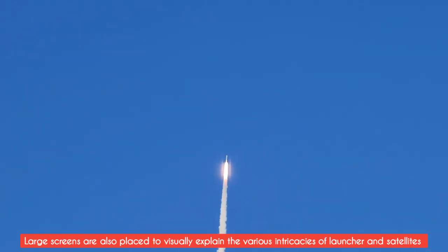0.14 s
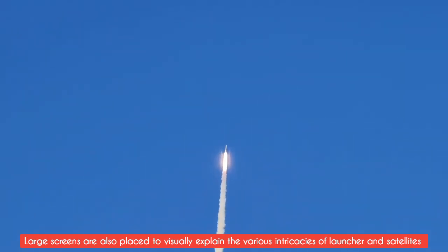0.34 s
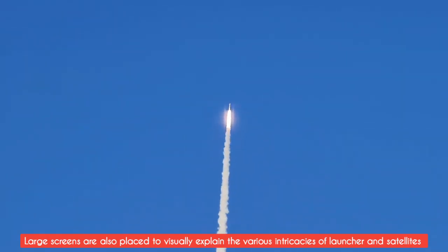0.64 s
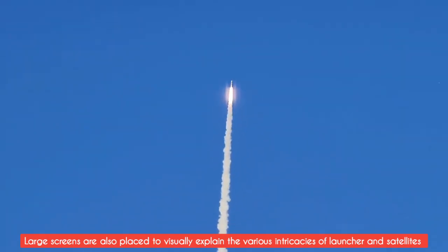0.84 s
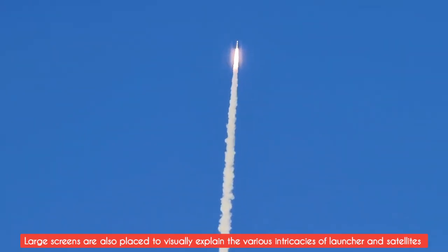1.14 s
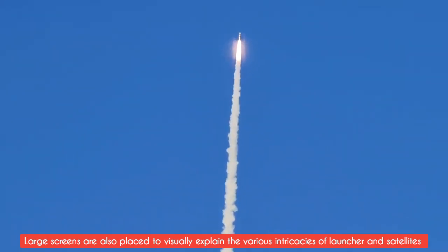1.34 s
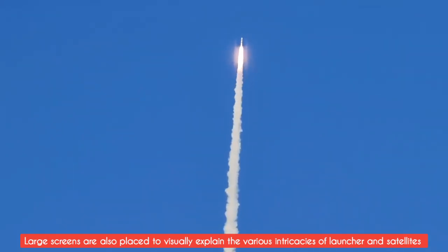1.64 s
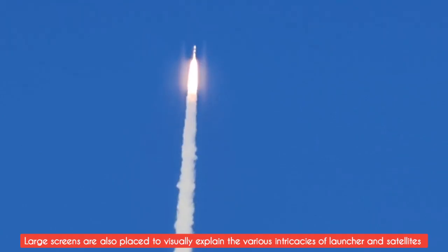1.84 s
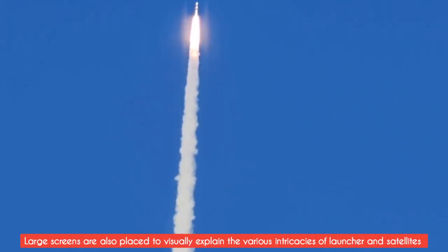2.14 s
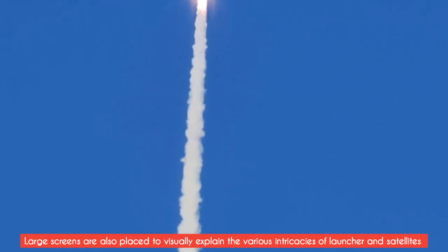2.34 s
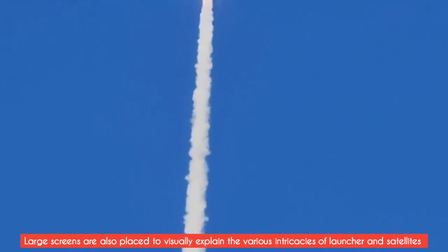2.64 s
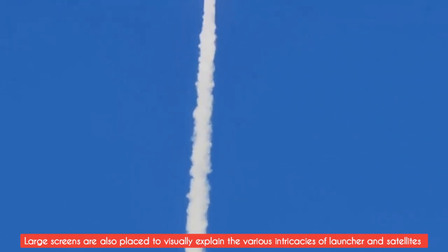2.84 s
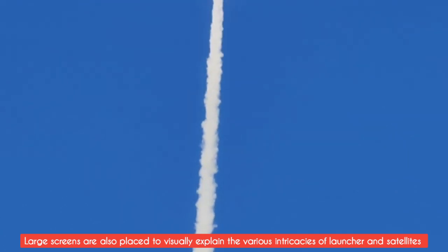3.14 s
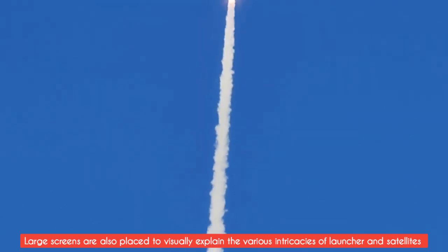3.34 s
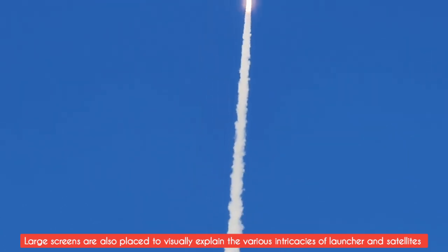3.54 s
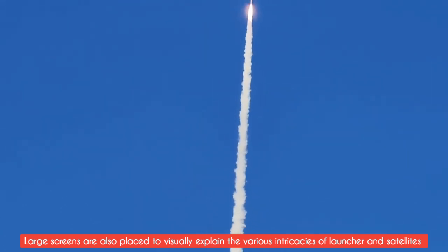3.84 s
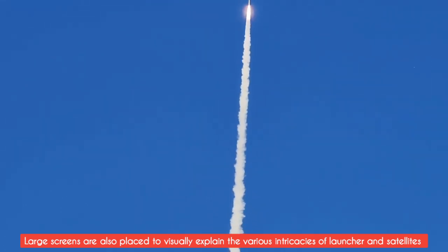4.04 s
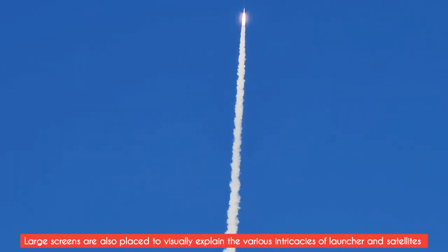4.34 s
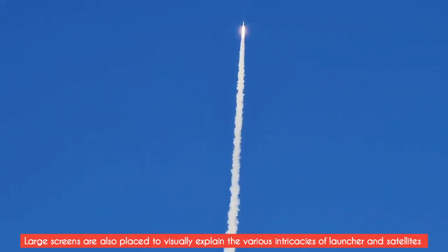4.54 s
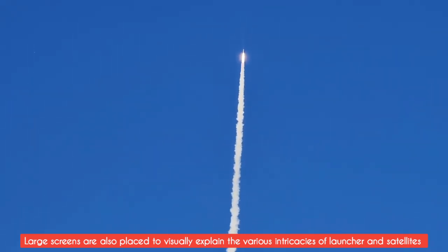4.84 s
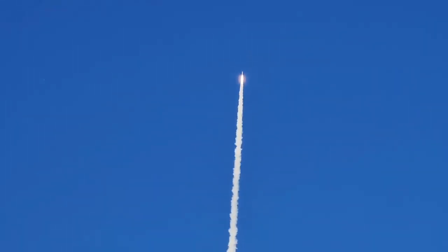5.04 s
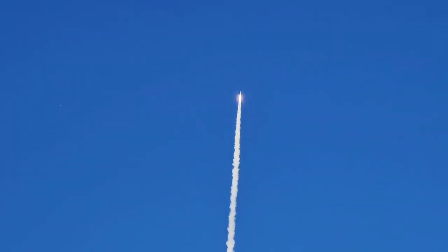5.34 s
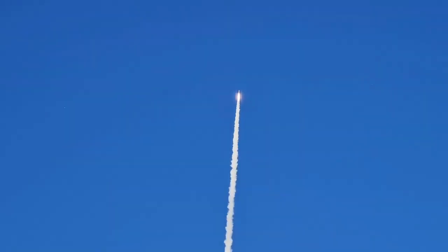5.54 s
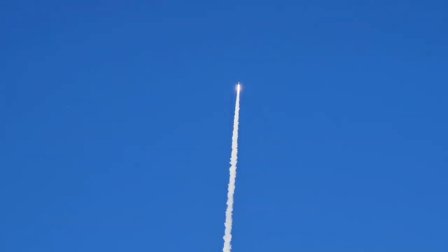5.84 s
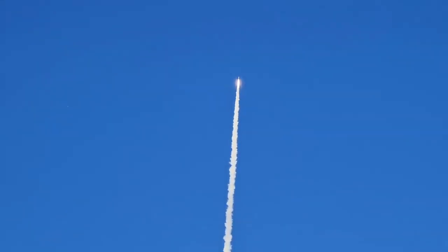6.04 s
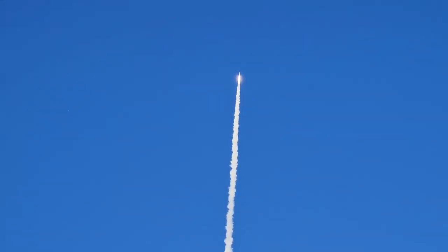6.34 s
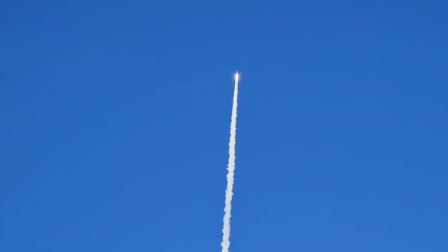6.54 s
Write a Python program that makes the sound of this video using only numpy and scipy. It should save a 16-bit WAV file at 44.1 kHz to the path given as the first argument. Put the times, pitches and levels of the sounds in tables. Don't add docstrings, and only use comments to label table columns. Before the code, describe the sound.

Low far-off rocket roar, sharp wind thumps and faint handling creaks; after a tiny silence, a jet-like hiss surges past and dulls into distance.

```python
import sys
import numpy as np
from scipy import signal
from scipy.fft import rfft, irfft, next_fast_len
from scipy.io import wavfile
from scipy.ndimage import uniform_filter1d

SR = 44100
rng = np.random.default_rng(int(sys.argv[2]) if len(sys.argv) > 2 else 0)


def generate_wav(signal):
    frames = np.transpose(np.atleast_2d(signal))
    scaled = np.clip(frames, -1, 1) * 32767
    pcm = np.round(scaled).astype(np.int16)
    wavfile.write(sys.argv[1], SR, pcm)


def elevation(decibels):
    levels = np.asarray(decibels, float)
    return 10 ** (levels / 20)


N = 295029

# (time [s], push height [full scale], push width [ms], rebound share [1])
GUST_PUSHES = [(.05, 0.12, 0.79, .05), (0.1275, 0.023, 0.51, .01), (0.129, -0.18, 0.65, 0.05),
               (.131, 0.11, 1.5, .01), (0.1405, 0.29, 1.0, 0.0096), (.143, -0.13, 1.14, .01),
               (.148, 0.16, 0.89, 0.28), (0.214, 0.24, 1.3, 0.1), (.841, 0.083, 1.14, .48),
               (1.704, 0.17, 0.84, .48), (1.9, 0.13, 0.62, .48), (2.227, 0.18, 1.06, 0.55),
               (2.317, 0.46, 1.94, .48), (2.437, 0.28, 0.89, .48), (2.828, 0.49, 1.4, .01),
               (2.8314, -0.51, 1.7, .01), (2.835, 0.53, 1.7, .01), (3.9715, 0.43, 0.83, 0.12),
               (4.2823, 0.47, .7, .01), (4.2839, 1.05, 1.01, 0.05), (4.2865, -0.32, 0.69, .01),
               (4.2885, 0.046, 1.2, .01), (4.292, .3, 1.9, .01), (4.413, 0.051, 1.3, .2),
               (4.462, 0.084, 1.8, .2), (4.51, 0.081, 1.13, .2), (4.71, 0.32, 1.03, 0.37),
               (4.973, 0.26, 0.89, .01), (4.978, 0.23, 0.83, .01), (4.9793, -0.36, 0.64, .01),
               (4.9813, 0.69, 1.54, 0.05), (4.9857, -0.31, 1.6, .01), (5.0057, 0.39, 1.9, 0.2),
               (5.013, .25, 1.4, .1), (5.0447, 0.25, 1.3, .05), (5.0467, -0.15, 0.53, .05),
               (5.17, 0.44, 1.5, .05), (5.18, 0.31, 1.34, .1), (5.1836, 0.43, 0.96, 0.085),
               (6.476, 0.094, 2.3, 0.55)]
# (start [s], end [s])
SILENCE_S = (78070 / SR, 78441 / SR)
# (time [s], beat rate [1/s])
BEAT_RATE = [(0, 21.9), (1.76, 21.9), (1.8, 20), (3.6, 20.05), (4.3, 20.35), (4.9, 20.65), (5.5, 21.25),
             (6.1, 21.5), (6.69, 21.7)]
# (time [s], shade at 8 kHz [dB])
SHADE_DB = [(1.78, 0), (2.1, -4), (2.33, -6), (2.6, -1.5), (3.2, 1.5), (4, 3.5), (4.2, 3.5), (4.36, 6.5),
            (4.5, 2), (4.8, 4.5), (5.2, 5.5), (6.05, 7), (6.25, 0), (6.69, 6.5)]
SPEED_M_PER_S = 46


def rms(x):
    return np.sqrt(np.mean(x ** 2) + 1e-20)


def rms_one(x):
    return x / rms(x)


def in_time(rows):
    s, *columns = np.transpose(rows)
    return [np.interp(np.arange(N) / SR, s, column) for column in columns]


def drift(rate_hz):
    r = np.exp(-80 * np.pi * rate_hz / SR)
    white = rng.standard_normal(N // 40 + 2002)
    slow = signal.lfilter([1], [1, -2 * r, r * r], white)[2000:]
    return np.interp(np.arange(N) / 40, np.arange(len(slow)), rms_one(slow))


def bumps(rows, half_s):
    marks = np.zeros(N)
    marks[[round(s * SR) for s, db in rows]] = np.array(rows)[:, 1]
    return signal.fftconvolve(marks, np.hanning(round(2 * half_s * SR)), "same")


def coloured(spectrum, edges_hz=(0, SR)):
    size = next_fast_len(N)
    hz = np.maximum(np.arange(size // 2 + 1) * SR / size, 1)
    point_hz, point_db = np.transpose(spectrum)
    gain = elevation(np.interp(np.log(hz), np.log(point_hz), point_db, left=-140, right=-140))
    shaped = rfft(rng.standard_normal(size)) * gain / np.sqrt(np.mean(gain ** 2))
    return [irfft(shaped * (hz >= low) * (hz < high), size)[:N] for low, high in zip(edges_hz, edges_hz[1:])]


def whistle(hz, width_hz):
    lowpass = signal.butter(2, width_hz / 2, fs=SR, output="sos")
    slow = signal.sosfilt(lowpass, rng.standard_normal((2, N)))
    turn = 2 * np.pi * np.cumsum(hz * np.ones(N)) / SR
    return rms_one(slow[0] * np.cos(turn) + slow[1] * np.sin(turn))


def even(x, share, window_s):
    window = round(window_s * SR)
    power = uniform_filter1d(uniform_filter1d(x ** 2, window), window)
    return rms_one(x / (power + 1e-9) ** (share / 2))


def rumble():
    # (time [s], strength [dB], brightness [dB])
    carried = [(0, -20, -3), (.15, -23.5, -2), (.3, -23, -3.5), (.7, -22.5, -5.5), (1, -24, 0),
               (1.5, -22, 1.5), (1.75, -21.5, 0.5), (1.85, -21.5, 0), (2.3, -20, 1), (2.9, -21, 3),
               (3.3, -24.5, 3.5), (3.8, -27.5, 4), (4.3, -25, 1), (4.6, -31, 7), (5, -21.5, 1),
               (5.4, -23.5, 1.5), (5.9, -26.5, 2), (6.69, -23.5, -0.5)]
    # (frequency [Hz], density [dB per Hz])
    deep_colour = [(25, -44.5), (40, 2), (55, 11.5), (70, 22), (90, 20.5), (110, 12), (140, -57),
                   (200, -78)]
    body_colour = [(80, -41), (105, -2), (140, 3), (180, -2.5), (230, -14), (270, -17.5), (340, -78),
                   (450, -79)]
    growl_colour = [(200, 3.5), (270, -4.5), (400, -11.5), (550, -19.5), (750, -34.5), (1200, -53.5),
                    (1800, -67.5)]
    # (centre [s], half length [s], rise [dB])
    rough_gusts = [(0.071, 0.14, 14), (0.404, 0.079, 1), (0.714, 0.15, 1.5), (1.2, .1, 0.5),
                   (1.5, 0.069, 4), (1.704, 0.1, 4), (2.3, 0.51, 8), (3.054, 0.38, 8), (3.456, 0.063, 3.5),
                   (4.005, 0.34, 6), (4.45, 0.18, 3), (4.754, 0.14, 10), (5.003, 0.051, 10.5),
                   (6.45, 0.59, 6.5)]
    # (time [s], level [dB])
    deep_lumps = [(0.163, -2), (0.256, 2.5), (0.331, -1.5), (0.531, 2.5), (0.612, -2.5), (0.694, 2.5),
                  (1.1, 2.5), (1.3, 1), (1.358, -3), (1.442, 2.5), (1.506, 0), (1.65, 2), (1.739, 3.5),
                  (1.805, -5), (2.086, -3.5), (2.24, 3), (2.48, -1), (2.64, -3), (2.803, 4), (2.98, 1.5),
                  (3.238, 4.5), (3.313, -3), (3.4, 2), (3.5, 2.5), (3.7, 1), (3.79, 2), (3.884, 4),
                  (4.02, 2), (4.116, 0), (4.21, 3.5), (4.286, 3), (4.37, -4), (4.429, 4), (4.52, 2.5),
                  (4.592, -6), (4.658, 7), (4.714, -1), (4.8, 2.5), (4.977, 1.5), (5.17, 3.5), (5.229, -2),
                  (5.385, 2), (5.565, -11), (5.635, -2), (5.76, -0.5), (5.975, 3.5), (6.116, 3),
                  (6.177, -2), (6.308, 2), (6.431, -8), (6.54, 0.5)]
    body_lumps = [(0.186, 8), (0.279, 3.5), (0.329, -2), (0.569, -3.5), (0.608, 5), (0.68, 9.5),
                  (0.812, -1), (0.859, 4), (1.016, -6), (1.19, 3.5), (1.247, 0.5), (1.361, -2),
                  (1.406, 1.5), (1.633, -4), (1.712, 4.5), (1.839, -7.5), (1.991, 0.5), (2.512, -4.5),
                  (2.832, -6.5), (2.946, 2.5), (3.02, -6), (3.211, 4), (3.565, 3.5), (3.694, -6),
                  (3.782, 2.5), (3.927, -5), (4.063, 3.5), (4.288, 2), (4.383, -0.5), (4.701, 5),
                  (4.993, 4), (5.073, -2.5), (5.259, -3.5), (5.349, 4.5), (5.605, 4.5), (5.719, -2),
                  (5.86, -1), (5.989, -11), (6.095, 5), (6.236, 4), (6.501, 5)]
    edge_lumps = [(.35, 1.5), (.75, 1.5), (1.05, -1), (1.45, -5), (1.6, -2.5), (1.75, -5.5), (1.85, -4),
                  (1.98, -4.5), (2.15, 0), (2.35, -1), (2.55, -4), (2.7, 5), (3.0, 2), (3.3, 3), (3.42, 6),
                  (3.55, 1.5), (3.75, 1), (4.13, -6), (4.4, -3), (4.52, 0.5), (4.88, 2), (5.3, 2.5),
                  (5.45, 2.5), (5.62, -6), (5.85, 2.5), (6.1, 2), (6.24, -2), (6.37, 6)]
    growl_calm_db, growl_follows = -38, 0.089
    opening_db, opening_hz, opening_end_s = -54.5, 655, 0.15

    t = np.arange(N) / SR
    strength_db, bright_db = in_time(carried)
    gusts_db = sum(db * np.exp(-((t - s) / half_s) ** 4) for s, half_s, db in rough_gusts)
    lumps = drift(27)
    edge_db = bumps(edge_lumps, half_s=0.1)

    deep_db = strength_db - bright_db + 1.8 * bumps(deep_lumps, half_s=0.043)
    deep_db = deep_db + 0.37 * drift(14) + 0.35 * lumps
    deep = elevation(deep_db) * even(coloured(deep_colour)[0], share=1.0, window_s=0.059)

    slices = coloured(body_colour, (0, 150, 210, SR))
    low, middle, edge = (rms(band) * even(band, share=0.72, window_s=0.036) for band in slices)
    body_db = strength_db + bright_db + 1.14 * bumps(body_lumps, half_s=0.041)
    body_db = body_db + 0.55 * drift(7.6) + 0.97 * lumps
    body = elevation(body_db) * rms_one(low + middle + elevation(edge_db) * edge)

    growl_db = growl_calm_db + growl_follows * (strength_db - strength_db.mean()) + gusts_db
    growl_db = growl_db + 0.3 * edge_db + 2.0 * drift(45) + 1.0 * lumps
    growl = elevation(growl_db) * even(coloured(growl_colour)[0], share=0.25, window_s=0.13)

    whip_level = elevation(opening_db + 4.2 * drift(45)) * np.exp(-(t / opening_end_s) ** 6)
    return deep + body + growl + whip_level * whistle(opening_hz, 380)


def thumps():
    out, t = np.zeros(N), np.arange(-1000, 2200) / SR
    rebound = np.sin(2 * np.pi * 128 * (t + 0.0017)) * np.exp(-((t - 0.004) / 0.0052) ** 2)
    for s, height, width_ms, share in GUST_PUSHES:
        u = (t / (width_ms / 1000 * 0.9)) ** 2
        push = (1 - u) * np.exp(-u / 2) - 0.043 * (1 - 7.2 * u) * np.exp(-5.5 * u / 2)
        at = round(s * SR) - 1000
        out[at:at + len(t)] += height * push + share * abs(height) * rebound
    foam = signal.butter(2, 4300, fs=SR, output="sos")
    return signal.sosfiltfilt(foam, out)


def creaks():
    # (time [s], ring level [dB], ring frequency [Hz], snap level [dB])
    ticks = [(0.347, -50, 1500, -66), (.372, -57, 3100, -68), (.379, -44.5, 1650, -69),
             (0.389, -57, 1600, -73), (.397, -62, 1600, -68), (.516, -74, 2600, -78),
             (.754, -61, 1190, -67), (.784, -62.5, 2800, -67), (.797, -58, 2820, -72.5),
             (.812, -66, 2600, -73), (.825, -45, 1300, -66), (0.846, -40.5, 1300, -60.5),
             (.868, -64, 2700, -77), (.89, -66, 2800, -69), (.908, -65, 1700, -73), (.93, -70, 3300, -70),
             (.945, -70, 3500, -69), (.96, -71, 3000, -69), (.981, -71, 3200, -71), (1.003, -59, 1400, -71),
             (1.025, -67, 3300, -75), (1.035, -68, 3500, -74), (1.053, -62, 2470, -73),
             (1.072, -60, 1320, -76), (1.082, -60, 1320, -75), (1.118, -72, 2500, -78),
             (1.533, -61, 3560, -69), (1.538, -54, 3780, -62), (1.5425, -39.5, 1250, -67),
             (1.55, -55, 1800, -69), (1.56, -52, 1900, -70), (1.566, -60, 3500, -68),
             (1.577, -49, 1700, -71), (1.585, -51, 1600, -67), (1.627, -60, 1320, -73.5)]
    # (centre [s], half length [s], level [dB])
    finger_rubs = [
        (.79, .03, -77.5),
        (.86, .03, -75),
        (.945, .025, -74),
        (1.03, 0.01, -77.5),
        (1.1, .015, -81),
        (0.386, .02, -78),
        (1.555, 0.035, -77),
    ]
    # (time [s], level [dB], frequency [Hz], half length [ms])
    squeaks = [(.347, -65, 3700, .7), (.365, -59, 1550, 1.2), (.382, -53.5, 1350, 2.2),
               (.388, -56, 2200, 1.5), (.3965, -53, 1600, 2.6), (.404, -60, 1700, 1.2),
               (.755, -67.5, 4300, 1.2), (.811, -61, 2550, 2.6), (.826, -64, 3900, 1.0),
               (.846, -56, 4400, .8), (.892, -70, 3050, 2.5), (.907, -60, 1700, 4.0),
               (.945, -69, 4400, 2.5), (.958, -69, 3450, 2.5), (1.005, -67, 3100, 2.5),
               (1.03, -70, 3300, 3.0), (1.054, -62, 2470, 2.6), (1.075, -59, 1320, 4.5),
               (1.535, -54, 1550, 2.2), (1.543, -57, 3700, 1.1), (1.547, -54, 1900, 1.5),
               (1.558, -61, 4300, .9), (1.566, -54, 1800, 1.2), (1.577, -63, 5000, .9),
               (1.595, -55, 1350, 2)]
    ring_ms, snap_ms, rustle_db, rustle_ms = 0.71, 0.76, -10.5, 8.0

    out, t = np.zeros(N), np.arange(-400, 600) / SR
    t_ms = t * 1000
    band = signal.butter(2, [2000, 4800], "band", fs=SR, output="sos")
    grit = signal.sosfilt(band, rng.standard_normal((len(ticks), len(t))))
    snap_shape = np.exp(-abs(t_ms) / snap_ms) + elevation(rustle_db) * np.exp(-((t_ms - 3.0) / rustle_ms) ** 2)
    for (s, ring_db, hz, snap_db), snap in zip(ticks, grit):
        at = round(s * SR) - 400
        ring = np.exp(-(t_ms / ring_ms) ** 2) * np.sin(2 * np.pi * hz * t)
        out[at:at + len(t)] += elevation(ring_db) * ring + elevation(snap_db) * rms_one(snap) * snap_shape
    for s, half_s, db in finger_rubs:
        shape = np.exp(-((np.arange(N) / SR - s) / half_s) ** 2)
        out += elevation(db + 3.6 * drift(120)) * shape * whistle(3500, 2600)
    for s, db, hz, half_ms in squeaks:
        at = round(s * SR) - 400
        out[at:at + len(t)] += elevation(db) * np.exp(-(t_ms / half_ms) ** 2) * np.sin(2 * np.pi * hz * t)
    return out


def far_air():
    # (frequency [Hz], density [dB per Hz])
    air_colour = [(500, -14), (800, 4), (1150, 0), (1300, 1), (1750, -11.5), (1900, -13), (2440, -22.5),
                  (3440, -18), (5800, -28), (8000, -42.5), (15500, -54.5)]
    air_db, air_rise_db_per_s, tone_start_db, tone_rise_db_per_s = -71.5, 5.5, -93, 13.5
    chirp_start_db, chirp_fade_db_per_s, chirp_end_s = -75.5, 19.5, 0.21
    throb_hz = 21.7

    t = np.minimum(np.arange(N) / SR, SILENCE_S[0])
    floor = elevation(air_db + air_rise_db_per_s * t + 1.6 * drift(40)) * coloured(air_colour)[0]
    throb_db = 3.2 * np.cos(2 * np.pi * throb_hz * (t - 1.365))
    tone_db = tone_start_db + tone_rise_db_per_s * t + 1.5 * drift(8) + throb_db
    chirp_db = chirp_start_db - chirp_fade_db_per_s * t - 800 * np.maximum(t - chirp_end_s, 0)
    return floor + elevation(tone_db) * whistle(1680, 60) + elevation(chirp_db) * whistle(3920, 320)


def self_noise():
    steep = signal.ellip(10, 0.3, 50, 15400, fs=SR, output="sos")
    noise = signal.sosfilt(steep, rng.standard_normal(N))
    rise_db = 3.0 * (np.arange(N) / SR > SILENCE_S[1])
    gaps_db = bumps([(4.52, -3), (5.36, -5.5), (6.33, -6), (6.535, -11)], 0.015)
    return elevation(-84 + rise_db + 2.5 * drift(20) + gaps_db) * noise


def passing(lag_s=0):
    closest_s, closest_m, fall_db_per_decade = 2.817, 7.87, 17
    along_m = SPEED_M_PER_S * (np.arange(N) / SR - closest_s - lag_s)
    far_m = np.hypot(along_m, closest_m)
    return far_m, along_m, -fall_db_per_decade * np.log10(far_m / closest_m)


def flutter(beat_db, second, fall_s, surge_s):
    # (time [s], level [dB])
    surges = [(1.886, 2), (1.925, -7), (1.946, -4), (1.967, -8), (1.997, -2), (2.069, 1.5), (2.093, 1),
              (2.626, 0.5), (2.694, -1.5), (2.77, -0.5), (2.798, -3), (2.92, 4), (2.954, -2.5), (3.057, -1),
              (3.249, -1), (3.35, -0.5), (3.396, 3.5), (3.448, -0.5), (3.554, 0), (3.596, -6.5),
              (3.612, 3.5), (3.686, -0.5), (3.722, -4), (3.945, 3.5), (4.057, 2.5), (4.115, -3),
              (4.502, -3), (4.779, -7.5), (4.805, -8), (4.827, -6), (4.845, 1), (4.943, -1.5), (5.126, 2.5),
              (5.149, 2.5), (5.212, 2.5), (5.33, 1.5), (5.364, -9), (5.408, -4), (5.422, -3.5), (5.46, -7),
              (5.496, -8.5), (5.566, 4.5), (5.637, -10), (5.655, 2.5), (5.729, -1), (5.96, -5),
              (6.014, 0.5), (6.096, 1), (6.19, -7), (6.334, -6), (6.425, -5), (6.573, -2)]
    turns = 2 * np.cumsum(in_time(BEAT_RATE)[0]) / SR + 1.6
    at = np.flatnonzero(np.diff(np.floor(turns)))
    draws = rng.random((len(at), 2))
    early = (draws[:, 1] * 200).astype(int)
    strength = np.where(np.floor(turns[at + 1]) % 2, second, 1)
    marks = np.zeros(N)
    marks[np.maximum(at - early, 0)] = 2 * draws[:, 0] * strength
    sinking = signal.lfilter([1], [1, -np.exp(-1 / (fall_s * SR))], marks)
    beats = uniform_filter1d(sinking, size=90)
    return beat_db * (beats - uniform_filter1d(beats, size=6000)) + bumps(surges, surge_s)


def buzz():
    # (multiple of the firing rate [1], depth [dB])
    harmonics = [(1, .95), (2, .85), (3, .45)]
    turn = 8 * np.pi * np.cumsum(in_time(BEAT_RATE)[0]) / SR
    return sum(db * np.cos(k * turn) for k, db in harmonics)


def passing_hiss(shared_db):
    # (frequency [Hz], density [dB per Hz])
    hiss_colour = [(450, 1.5), (650, 8), (1000, 4), (1400, -0.5), (2000, -1.5), (3200, -6.5), (4200, -5),
                   (6500, -7.5), (10000, -10.5), (13000, -12.5), (15300, -17), (15600, -26)]
    # (lower edge [Hz], level while ahead [dB], level once past [dB])
    shelves = [(7000, -4.5, -1.5), (8500, 8.5, -0.5), (10000, 8.5, -1.5), (11600, -2, -3.5)]
    # (lower edge [Hz], start [s], step [dB])
    closings = [
        (11600, 4.07, -6.5),
        (11600, 4.42, 3),
        (10000, 4.43, -3),
        (10000, 4.86, 0.5),
        (10000, 5.3, -4),
        (10000, 6.4, -3),
        (8500, 5.4, -0.5),
        (8500, 6.8, 0),
        (7000, 7.8, -1),
    ]
    # (frequency [Hz], width [Hz], loudest [s], half length [s], level [dB])
    pipe_notes = [(1232, 98, 2.37, .4, -48.5), (1644, 120, 2.36, .2, -50), (870, 85, 2.45, 0.066, -35.5),
                  (840, 34, 2.75, 0.14, -37.5), (1350, 110, 3.14, 0.11, -38), (1390, 60, 3.56, 0.13, -50),
                  (1454, 78, 2.92, .1, -42), (1410, 50, 3.3, .025, -42), (1295, 60, 2.6, 0.047, -35),
                  (1600, 72, 2.75, 0.12, -43), (2310, 110, 2.87, 0.19, -44), (2330, 140, 3.54, .15, -56),
                  (3000, 900, 3.8, 0.38, -59), (670, 100, 2.62, 0.16, -38.5), (1170, 60, 5.45, 0.78, -57.5),
                  (1380, 53, 3.3, 0.11, -50.5), (4170, 1200, 1.95, .15, -62)]
    hiss_db = -28.5
    loss_near_db, loss_db_per_m, ahead_loss_db_per_m = -3, -0.1383, -0.5222
    dip_ahead_hz, dip_behind_hz, dip_depth_db, dip_octaves, dip_fills_m = 1990, 1014, -4.5, 0.15, 87

    t = np.arange(N) / SR
    far_m, along_m, spread_db = passing()
    shade_db = in_time(SHADE_DB)[0]
    level_db = hiss_db + spread_db + 0.33 * shade_db
    loss_db = shade_db + loss_near_db + loss_db_per_m * far_m + ahead_loss_db_per_m * (far_m - along_m) / 2
    roar_db = -2 + 2.5 * np.exp(-((t - 2.46) / 0.32) ** 4) + 4 * (1 + np.tanh((t - 3.72) / 0.047)) / 2
    dip_hz = dip_ahead_hz * (dip_behind_hz / dip_ahead_hz) ** ((1 + along_m / far_m) / 2)
    dip_db = dip_depth_db * np.exp(-(far_m / dip_fills_m) ** 2)
    far_share = 1 - np.exp(-(far_m / 25.0) ** 2)

    edges_hz = [*np.geomspace(450, 7000, 21), 7700, 8500, 9200, 10000, 10800, 11600, 12500, 13500, 14500, 16000]
    hiss = 0
    for low, high, band in zip(edges_hz, edges_hz[1:], coloured(hiss_colour, edges_hz)):
        hz = np.sqrt(low * high)
        band_db = loss_db * np.clip(hz / 8000 - 0.15, 0, 2) ** 1.5
        for above_hz, ahead_db, past_db in shelves:
            if hz > above_hz:
                band_db = band_db + far_share * np.where(along_m < 0, ahead_db, past_db)
        for above_hz, s, db in closings:
            if hz > above_hz:
                band_db = band_db + db * np.clip((t - s) / 0.02, 0, 1)
        band_db = band_db + roar_db * np.clip((1200 - hz) / 350, 0, 1)
        band_db = band_db + dip_db * np.exp(-(np.log2(hz / dip_hz) / dip_octaves) ** 2)
        unsteady_db = shared_db * np.clip(hz / 3000, 0.35, 1.1) * (1 + hz / 40000) + 2.65 * drift(75)
        hiss = hiss + elevation(band_db + unsteady_db) * band

    early_far_m, early_along_m, _ = passing(-0.34)
    sound_m_per_s = 343
    hollow_hz = 1554 / (1 + SPEED_M_PER_S / sound_m_per_s * early_along_m / early_far_m)
    hollow_db = -1.5 * np.maximum(-early_along_m, 0) - 37 + 1.37 * passing(0.055)[2]
    drone_db = 0.89 * roar_db - 45.5 + 0.56 * passing(-0.25)[2]
    out = elevation(level_db) * hiss + elevation(hollow_db) * whistle(hollow_hz, 190) + elevation(drone_db) * whistle(840, 55)
    for hz, width_hz, s, half_s, db in pipe_notes:
        out = out + elevation(db) * np.exp(-((t - s) / half_s) ** 2) * whistle(hz, width_hz)
    return out


def shrill_band(shared_db):
    # (frequency [Hz], width [Hz], level [dB])
    modes = [(4020, 580, -2), (4745, 450, -3)]
    pair = sum(elevation(db) * whistle(hz, width_hz) for hz, width_hz, db in modes)
    level_db = in_time(SHADE_DB)[0] - 46 + 0.8 * passing(0.41)[2]
    return elevation(level_db + 1.0 * shared_db + 1.5 * drift(40)) * pair


def spliced(before, after, lows):
    # (time [s], height [full scale], frequency [Hz], direction in time [1])
    cut_swings = [
        (0, .1, 110, 1),
        (78069 / SR, .052, 150, -1),
        (78441 / SR, .118, 110, 1),
        ((N - 1) / SR, -.01, 110, -1),
    ]
    blip_s, blip_height, blip_half_s = 1.77385, 0.041, 0.0013
    t = np.arange(N) / SR
    for s, height, hz, way in cut_swings:
        since = np.maximum((t - s) * way, 0)
        hold = np.exp(-(since / 0.0014) ** 2) * ((t - s) * way > -0.5 / SR)
        swing = np.cos(2 * np.pi * hz * since) + 1.4 * np.sin(2 * np.pi * hz * since)
        lows = lows * (1 - hold) + hold * height * swing
    blip = blip_height * np.clip(1 - abs(t - blip_s) / blip_half_s, 0, 1)
    blip = blip * (1 + 0.12 * np.sin(2 * np.pi * 3800 * t))
    return (lows + before) * (t < SILENCE_S[0]) + (lows + after) * (t >= SILENCE_S[1]) + blip


def scene():
    duck_db = -9.5 * np.tanh(bumps([(s, abs(height)) for s, height, *_ in GUST_PUSHES], half_s=0.013))
    lows = elevation(duck_db) * rumble() + thumps()
    before = creaks() + far_air()
    shared_db = flutter(beat_db=2.5, second=0.099, fall_s=0.0073, surge_s=0.015) + 1.0 * drift(140) + buzz()
    after = passing_hiss(shared_db) + shrill_band(shared_db)
    return spliced(before, after, lows + self_noise())[None]


def low_pass(x):
    return signal.sosfilt(signal.butter(12, 15360, fs=SR, output="sos"), x)


def record(dry):
    rounded = dry / (1 + abs(dry) ** 12) ** (1 / 12)
    return low_pass(rounded)


dry = scene()
out = record(dry)
generate_wav(out)
```